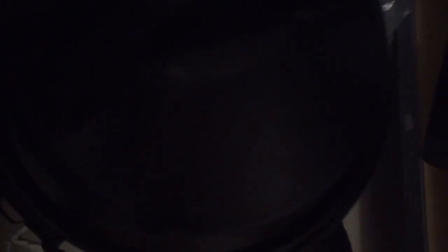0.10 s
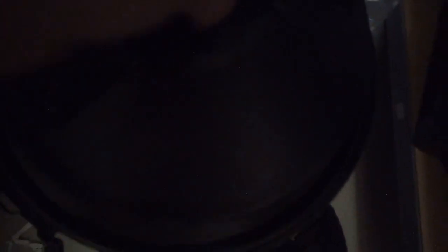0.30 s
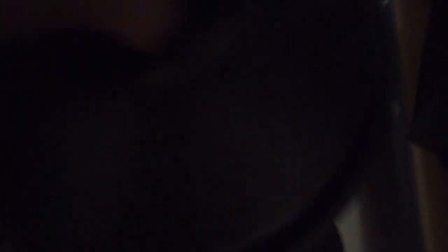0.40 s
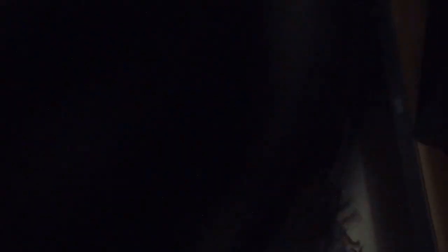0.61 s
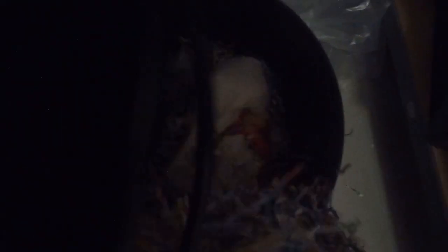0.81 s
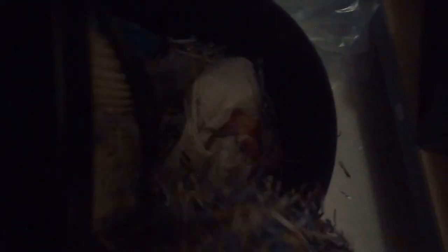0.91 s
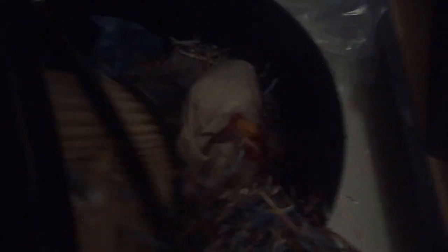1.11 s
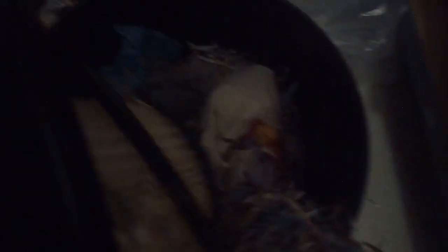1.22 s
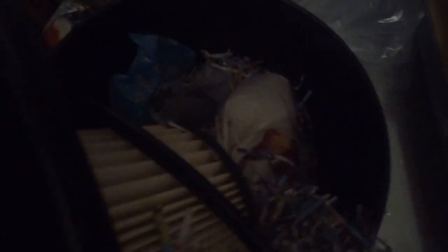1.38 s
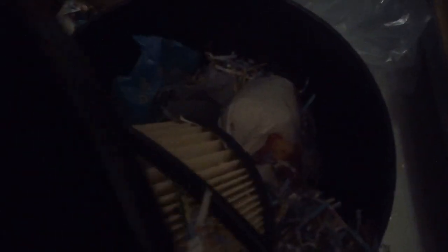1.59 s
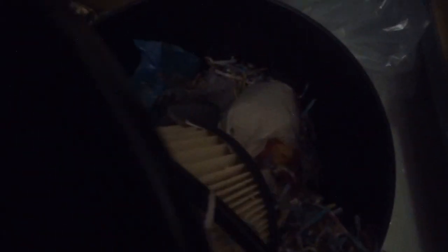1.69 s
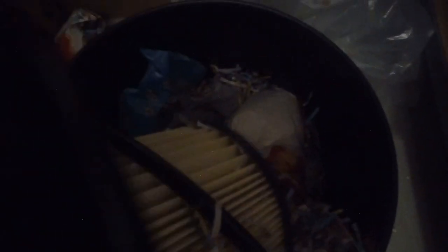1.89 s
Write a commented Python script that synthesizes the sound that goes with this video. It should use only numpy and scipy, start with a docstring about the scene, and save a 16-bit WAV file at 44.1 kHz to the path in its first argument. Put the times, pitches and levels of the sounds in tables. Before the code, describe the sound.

A plastic lid clatters off a shop vacuum in a small room. From 0.2 to 0.8 seconds it knocks and clacks against the hollow, ringing tub, while the motor's faint whine falls away over soft hissing air. The loudest snaps come around 0.9 to 1.1 seconds, and a catch clicks sharply at 1.3. The lid scrapes the rim from 0.9, ending in a short low groan near 1.5.

```python
"""A shop vacuum's motor coasts down with a falling whine and a rush of air from its slowing fan.
Meanwhile its plastic lid is worked loose and lifted off: lid and tub knock and clack, catches snap,
and the hollow tub rings. The lid scrapes over the rim in tiny slips, and the rim gives a short
stick-slip groan. A small room answers the whine and the knocks."""
import sys
import numpy as np
from scipy import signal
from scipy.fft import rfft, irfft, next_fast_len
from scipy.io import wavfile
from scipy.ndimage import map_coordinates

SR = 44100
rng = np.random.default_rng(int(sys.argv[2]) if len(sys.argv) > 2 else 0)


def digitize_waveform(pressure):
    """Quantize a signal to 16-bit integers and store it at the path in sys.argv[1].

    Rows of a 2-D input are taken as channels; values are limited to [-1, 1].
    """
    field = np.atleast_2d(pressure).T
    bounded = np.clip(field, -1, 1)
    quanta = np.round(bounded * 32767).astype(np.int16)
    wavfile.write(sys.argv[1], SR, quanta)


N = 83790

# The coasting motor's whine. Each row: time in seconds, level in dB, jitter as a share of the pitch.
WHINE_CURVE = [(0, -51.5, .05), (.07, -53.5, 0.049), (.19, -58, 0.0297), (.246, -45, .006),
               (.29, -46.5, .006), (.346, -51.5, .006), (0.599, -67.5, 0.027), (1.0, -88, .017)]
# Its harmonics. Each row: multiple of the pitch, level in dB.
WHINE_HARMONICS = [(1, 1.5), (2, -6), (3, -5)]
WHINE_HZ, COAST_S = 1603, .93  # starting pitch; time to fall by a factor e
WHINE_FLUTTER_DB, WHINE_ECHO_DB = 2.5, -9
# Air through the slowing fan. Each row: time in seconds, level in dB.
AIR_LEVEL = [(0, -50.5), (.14, -62), (.3, -50.5), (.65, -50.5), (.88, -52.5), (1.6, -54), (1.75, -60.5),
             (1.84, -69.5), (1.9, -53.5)]
# Its bright hiss. Each row: frequency in Hz, level in dB.
AIR_EQ = [(25, -37), (80, -17), (250, -19), (550, -13), (950, -9.5), (1900, -7), (2800, -0.5), (4700, 3),
          (6000, -0.5), (7500, -31), (15000, -40)]

# Lid meets tub. Each row: start in seconds, then hard clack, hollow knock and crisp edge levels in dB.
HITS = [(.003, -58, -52, -82), (0.073, -54, -81, -85), (0.157, -67, -79, -75), (0.201, -39.5, -45.5, -72),
        (.217, -43, -39.5, -66), (0.225, -45, -40, -69), (.321, -51, -70, -68), (.34, -40.5, -67, -63),
        (0.349, -26.5, -42.5, -51), (0.375, -32.5, -33, -56.5), (0.404, -28.5, -36.5, -52),
        (0.428, -28.5, -43, -52), (.501, -30, -41, -81.5), (0.576, -54, -52.5, -91), (0.682, -28, -31, -68),
        (0.701, -37, -32, -81), (0.731, -34, -36.5, -64.5), (0.77, -36, -41, -67), (.809, -46, -62, -82),
        (0.852, -46.5, -65, -67), (0.896, -39.5, -33, -86), (0.9229, -17.5, -31, -42),
        (0.9728, -20, -41, -43.5), (1.022, -22.5, -57, -49.5), (1.049, -20, -54, -42),
        (1.057, -24, -57, -47), (1.195, -65, -31.5, -77), (1.3145, -27.5, -48, -49.5),
        (1.867, -53.5, -80, -95), (1.895, -40, -55, -88)]
# The tone of those three layers. Each row: frequency in Hz, level in dB.
CLACK_EQ = [(60, -38), (300, -56), (550, -22), (800, -18.5), (1300, -8.5), (1800, -9), (2600, -8.5),
            (3200, -4), (3800, -1), (4700, 0.5), (5300, -4), (6000, -7), (7000, -18.5), (8100, -49),
            (16000, -48.5)]
HOLLOW_EQ = [(50, -36), (150, -5), (290, -0.5), (430, -13.5), (600, -6), (700, -10), (830, 0.5), (980, -11),
             (1200, -2), (1550, -11), (1800, -8.5), (2800, -11.5), (5000, -12.5), (9000, -65.5)]
EDGE_EQ = [(3000, -37.5), (7000, 10.5), (10000, 3), (13500, -4.5), (15300, 10), (16000, -6)]
CLACK_T60, HOLLOW_T60, EDGE_T60 = 0.17, 0.24, 0.13  # seconds
RATTLE_DB, RATTLE_PER_S = 1.3, 330
# The ringing lid. Each row: frequency in Hz, level in dB, t60 in seconds.
LID_RING = [(2164, -9, 0.13), (3700, -3.5, 0.14), (3682, -1.5, 0.2), (3960, 5.5, 0.31), (3970, -27, 0.13),
            (4350, 4, 0.15), (4440, 2, 0.13), (4590, -5, 0.18), (4500, -2, 0.42), (4600, -8, 0.28),
            (5300, -3, .3), (5870, -10, 0.2)]
LID_DB = -20.5  # relative to each clack
# Dry snaps of hard edges. Each row: start in seconds, level in dB.
SNAP_HITS = [(0.2013, -28), (0.2243, -28), (0.259, -37.5), (0.271, -42.5), (.349, -27), (.579, -37.5),
             (0.81, -33), (0.8999, -29), (0.9226, -18), (0.9751, -17.5), (1.0497, -17.5), (1.086, -23.5),
             (1.864, -38)]
# Their sharp tone. Each row: frequency in Hz, level in dB.
SNAP_EQ = [(500, -17), (2500, -12.5), (4200, -3.5), (5200, 5), (6100, 1.5), (7500, -33.5), (16000, -42.5)]
SNAP_T60, SNAP_ATTACK_S = 0.011, 0.00043
# Plastic catches let go. Each row: start in seconds, level in dB, pitch as a ratio to their modes.
CATCH_HITS = [(1.315, -14, 0.99), (1.895, -40, 0.94)]
# A catch's modes. Each row: frequency in Hz, level in dB, t60 in seconds.
CATCH_RING = [(4566, -3, 0.039), (4870, -11, 0.016), (4640, -14.5, .06)]

# Dull bumps of the tub. Each row: start in seconds, level in dB, pitch in Hz, t60 in seconds.
BUMP_HITS = [(.004, -45, 215, .15), (.026, -38, 265, 0.069), (0.207, -41, 95, 0.27),
             (0.224, -29.5, 227, 0.034), (0.337, -33.5, 125, 0.091), (.351, -26, 240, 0.2),
             (0.375, -34, 113, 0.15), (0.387, -27, 303, 0.099), (0.415, -33, 84, 0.068),
             (0.433, -27, 295, 0.17), (0.468, -31, 90.1, 0.28), (.5, -19.5, 287, 0.055),
             (0.506, -37, 133.6, 0.18), (0.555, -42, 132.3, 0.31), (0.608, -58, 86.5, 0.13),
             (0.685, -25, 301, 0.13), (0.731, -31, 160, 0.053), (0.821, -54, 85, 0.24),
             (0.756, -34.5, 113, 0.17), (0.899, -17.5, 262, 0.053), (.9, -26, 95, 0.088),
             (0.963, -36, 136, 0.16), (1.196, -25, 213, 0.081), (1.206, -36.5, 88, 0.1),
             (1.314, -42, 253, 0.26)]
BUMP_SIDE_DB, BUMP_ATTACK_S = -8.5, 0.002
# Knocks on the covered tub. Each row: start in seconds, level in dB.
CLOSED_HITS = [(0.227, -31.5), (.44, -33)]
# The covered tub's modes. Each row: frequency in Hz, level in dB, t60 in seconds.
CLOSED_RING = [(603, -7.5, 0.12), (826, 2, 0.11), (953, -3.5, 0.091)]
# The freed tub rings on. Each row: start in seconds, upper modes in dB, deep mode in dB.
OPEN_HITS = [(.684, -25, -66.5), (.732, -50, -26.5)]
# Its upper modes. Each row: frequency in Hz, level in dB, t60 in seconds.
OPEN_RING = [(842, -.5, 0.31), (845, -11.5, 0.5), (1110, -8, 0.16), (1195, 2, 0.086), (1350, -13, 0.31),
             (1390, -4, 0.17), (1732, -7.5, 0.25), (2097, -4, 0.084), (2560, -28, 0.24), (3490, -10, 0.46),
             (4490, -9.5, .2), (346, -2, .11), (598, -10, 0.15)]
DEEP_HZ, DEEP_HOLD_S, DEEP_T60 = 286, 0.044, 0.35
FLEX_HZ, FLEX_DB, FLEX_PER_S = 7.4, 1.6, 70  # each mode's waver: in pitch, in level, how fast

# The lid drags over the rim. Each row: time in seconds, level in dB.
DRAG_LEVEL = [(0, -105), (.33, -75), (.37, -55), (.45, -43.5), (.49, -59), (.56, -45.5), (.64, -63),
              (.9, -76), (.94, -37), (1.08, -32), (1.15, -35.5), (1.22, -35), (1.3, -39.5), (1.33, -31),
              (1.39, -34), (1.47, -38.5), (1.6, -57.5), (1.9, -118)]
# The scrape's hollow tone. Each row: frequency in Hz, level in dB.
DRAG_EQ = [(40, -26.5), (90, -11.5), (170, -8), (280, -1), (380, -8), (550, -10), (710, -5), (790, 1.5),
           (860, 2), (970, -4.5), (1350, 2), (1800, -4.5), (2250, -1), (3100, -6), (4600, -0.5), (5400, -6),
           (6400, -13.5), (8000, -37), (15000, -53)]
SLIPS_PER_S, SLIP_SPREAD_DB = 5000, 2
GROAN_START_S, GROAN_RISE_S, GROAN_FALL_S, GROAN_DB = 1.4, 0.062, 0.076, -39
GROAN_HZ, GROAN_SAG_HZ_PER_S, GROAN_OCTAVE_DB = 149.4, 162, -0.5
# Resonances of the plastic shell. Each row: frequency in Hz, width in Hz, level in dB.
SHELL_PEAKS = [(780, 15.6, 4.5), (845, 9.8, 1.5), (1464, 7.5, -6), (2134, 9.4, 2.5), (2290, 16, -3),
               (2860, 20, 4), (3700, 10, -6.5), (4590, 31, -8)]
# A faint thin tone as the scraping ends. Each row: time in seconds, level in dB.
THIN_LEVEL = [(1.4, -78), (1.6, -66.5), (1.85, -71)]
THIN_HZ, THIN_SWELLS_PER_S = 2640, 16

# The small room's decay. Each row: frequency in Hz, t60 in seconds.
ROOM_DECAY = [(100, 0.23), (800, 0.32), (4000, 0.19), (7000, 0.088), (14000, 0.25)]
# Still room tone. Each row: frequency in Hz, level in dB.
FLOOR_EQ = [(25, -11), (90, 0), (250, 2.5), (600, -11.5), (1300, -10), (5000, -17), (8000, -33.5),
            (13000, -35), (15500, -24)]
ROOM_DB, FLOOR_DB = -8, -70.5
LOW_CUT_HZ, TOP_HZ = 57.6, 16300


def motor():
    """The coasting motor's whine sinks, rough at first and clearer as it falls; the room smears its pitch."""
    times, dbs, jitters = np.transpose(WHINE_CURVE)
    jitter = np.interp(since(), times, jitters) * wobble(400)
    hz = WHINE_HZ * np.exp(-since() / COAST_S) * (1 + jitter)
    phase = 2 * np.pi * np.cumsum(hz) / SR
    tone = sum(amp(db + WHINE_FLUTTER_DB * wobble(91.4)) * np.sin(k * phase)
               for k, db in WHINE_HARMONICS)
    whine = amp(np.interp(since(), times, dbs)) * unit(tone)
    return whine + amp(WHINE_ECHO_DB) * room(whine)


def fan_air():
    """Air hisses through the slowing fan."""
    return level(AIR_LEVEL) * coloured(rng.standard_normal(N), AIR_EQ)


def knocks():
    """Each hit excites the plastic's crowded modes in three layers, with loose parts chattering."""
    out = np.zeros(N)
    times, *layers = np.transpose(HITS)
    for dbs, eq, t60 in zip(layers, (CLACK_EQ, HOLLOW_EQ, EDGE_EQ), (CLACK_T60, HOLLOW_T60, EDGE_T60)):
        power = sum(amp(db) ** 2 * fade(since(s), t60) ** 2 for s, db in zip(times, dbs))
        chatter = amp(RATTLE_DB * wobble(RATTLE_PER_S))
        out += np.sqrt(power) * coloured(chatter * rng.standard_normal(N), eq)
    return out


def lid():
    """Every clack strikes the same bright modes of the lid."""
    blows = np.zeros(N)
    for s, clack_db, _, _ in HITS:
        blows[round(s * SR)] += amp(clack_db + LID_DB)
    return signal.fftconvolve(blows, ring(0, LID_RING))[:N]


def snaps():
    """Hard edges first touch with a crack a few milliseconds long."""
    envelope = sum(amp(db) * fade(since(s), SNAP_T60, SNAP_ATTACK_S) for s, db in SNAP_HITS)
    return envelope * coloured(rng.standard_normal(N), SNAP_EQ)


def catches():
    """Each catch snaps and rings the same few modes at its own pitch."""
    out = np.zeros(N)
    for s, db, ratio in CATCH_HITS:
        modes = [(hz * ratio, mode_db, t60) for hz, mode_db, t60 in CATCH_RING]
        out += amp(db) * ring(s, modes, attack_s=0.00028)
    return out


def bumps():
    """The tub wall flexes: one low mode and two weaker neighbours per bump."""
    out = np.zeros(N)
    spacings = 0.224 * rng.uniform(0.32, 1.49, (len(BUMP_HITS), 2))  # shares of the pitch
    for (s, db, hz, t60), (below, above) in zip(BUMP_HITS, spacings):
        neighbours = [(hz * ratio, BUMP_SIDE_DB, t60) for ratio in (1 - below, 1 + above)]
        out += amp(db) * ring(s, [(hz, 0, t60)] + neighbours, BUMP_ATTACK_S)
    return out


def tub():
    """Covered, the tub rings briefly; open, it wavers and rings on, its deep mode holding a moment."""
    out = sum(amp(db) * ring(s, CLOSED_RING) for s, db in CLOSED_HITS)
    for s, upper_db, deep_db in OPEN_HITS:
        upper = sum(amp(db) * fade(since(s), t60) * flexing(hz, s) for hz, db, t60 in OPEN_RING)
        attack = 1 - np.exp(-since(s) / BUMP_ATTACK_S)
        decay = np.exp(-np.log(1000) * since(s + DEEP_HOLD_S) / DEEP_T60)
        out += amp(upper_db) * upper + amp(deep_db) * attack * decay * flexing(DEEP_HZ, s)
    return out


def flexing(hz, s):
    """The flexing wall unsettles the pitch and level of a mode struck at s."""
    drift = np.cumsum(FLEX_HZ * wobble(FLEX_PER_S) * (since(s) > 0)) / SR
    return amp(FLEX_DB * wobble(FLEX_PER_S)) * np.sin(2 * np.pi * (hz * since(s) + drift))


def drag():
    """The lid scrapes the rim: dense, uneven slips sound through the tub's resonances."""
    slips = (rng.random(N) < SLIPS_PER_S / SR) * rng.choice([-1, 1], N)
    sizes = amp(SLIP_SPREAD_DB * np.minimum(rng.exponential(size=N), 4))
    return level(DRAG_LEVEL) * coloured(slips * sizes, DRAG_EQ)


def groan():
    """The rim sticks and slips regularly, sagging in pitch; the octave blooms at the peak."""
    t = since(GROAN_START_S)
    phase = 2 * np.pi * np.cumsum(GROAN_HZ - GROAN_SAG_HZ_PER_S * t) / SR
    force = np.interp(t, [0, GROAN_RISE_S, GROAN_RISE_S + GROAN_FALL_S], [0, 1, 0])
    octave = amp(GROAN_OCTAVE_DB) * force ** 2 * np.sin(2 * phase)
    return amp(GROAN_DB) * (force * np.sin(phase) + octave)


def shell(x):
    """The plastic shell adds its narrow resonances to x."""
    return filtered(x, lambda f: 1 + sum(amp(db) * 1j * f * width / (hz * hz - f * f + 1j * f * width)
                                         for hz, width, db in SHELL_PEAKS))


def thin_tone():
    """A narrow, faint tone swells and drops out at random."""
    phase = 2 * np.pi * THIN_HZ * since()
    tone = wobble(THIN_SWELLS_PER_S) * np.sin(phase) + wobble(THIN_SWELLS_PER_S) * np.cos(phase)
    return level(THIN_LEVEL) * unit(tone)


def room(x):
    """The room's diffuse tail, each frequency dying at its own speed."""
    hz, t, spectrum = signal.stft(rng.standard_normal(SR // 2), SR, nperseg=256)
    decay = np.exp(-np.log(1000) * t / along(ROOM_DECAY, hz)[:, None])
    tail = signal.istft(spectrum * decay, SR, nperseg=256)[1]
    return signal.fftconvolve(x, tail / np.linalg.norm(tail))[:N]


def amp(db):
    """Decibels to gain."""
    return 10 ** (np.asarray(db) / 20)


def unit(x):
    """Scale to rms 1."""
    return x / np.sqrt(np.mean(x ** 2) + 1e-20)


def along(points, hz):
    """Read (Hz, value) points on a log axis."""
    f, v = np.transpose(points)
    return np.interp(np.log(hz + 1), np.log(f + 1), v)


def since(s=0):
    """Seconds since s, zero before."""
    return np.maximum(np.arange(N) / SR - s, 0)


def level(rows):
    """A fader ride: gain per sample from (s, dB) points."""
    return amp(np.interp(since(), *np.transpose(rows)))


def wobble(rate):
    """A smooth random curve, rate knots a second."""
    return map_coordinates(rng.standard_normal(int(N * rate / SR) + 4), [since() * rate])


def filtered(x, response):
    """x through a frequency response."""
    size = next_fast_len(N + 8192)
    return irfft(rfft(x, size) * response(np.fft.rfftfreq(size, 1 / SR)), size)[:N]


def coloured(x, eq):
    """x through a (Hz, dB) EQ curve, at rms 1."""
    return unit(filtered(x, lambda hz: amp(along(eq, hz))))


def fade(t, t60, attack_s=0.0011):
    """Quick attack and exponential decay."""
    return (1 - np.exp(-t / attack_s)) * np.exp(-np.log(1000) * t / t60)


def ring(s, modes, attack_s=0.0004):
    """Damped (Hz, dB, t60) modes struck at s."""
    t = since(s)
    return sum(amp(db) * fade(t, t60, attack_s) * np.sin(2 * np.pi * hz * t) for hz, db, t60 in modes)


def scene():
    """Motor and handling over quiet room tone, the hard contacts sent to the room reverb."""
    contacts = shell(knocks()) + snaps() + catches() + bumps()
    room_tone = amp(FLOOR_DB) * coloured(rng.standard_normal(N), FLOOR_EQ)
    vacuum = motor() + fan_air()
    handling = contacts + lid() + tub() + shell(drag()) + groan() + thin_tone()
    return (vacuum + handling + amp(ROOM_DB) * room(contacts) + room_tone)[None]


def record(dry):
    """Roll off the deep bass and cut everything above TOP_HZ."""
    low_cut = signal.butter(4, LOW_CUT_HZ, "high", fs=SR, output="sos")
    return filtered(signal.sosfilt(low_cut, dry[0]), lambda hz: hz < TOP_HZ)[None]


dry = scene()
out = record(dry)
digitize_waveform(out)
```